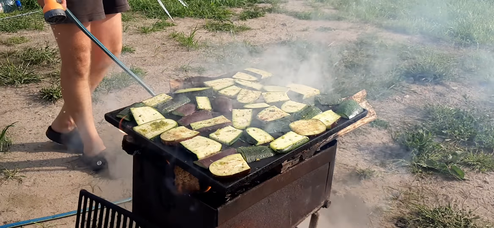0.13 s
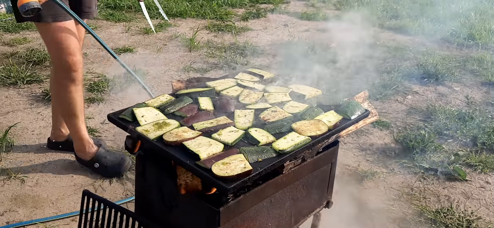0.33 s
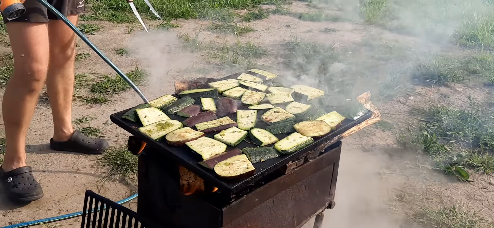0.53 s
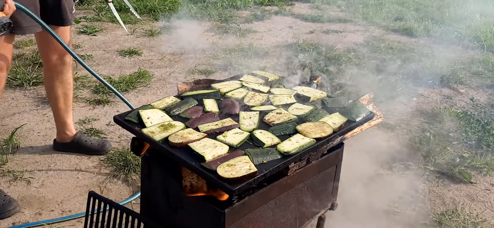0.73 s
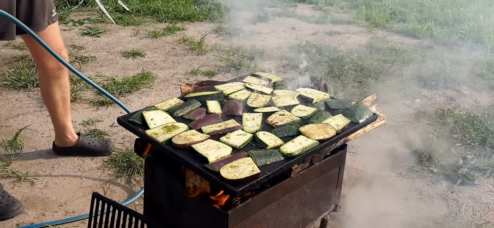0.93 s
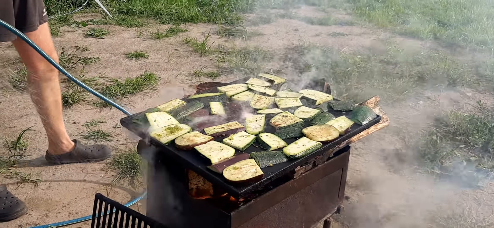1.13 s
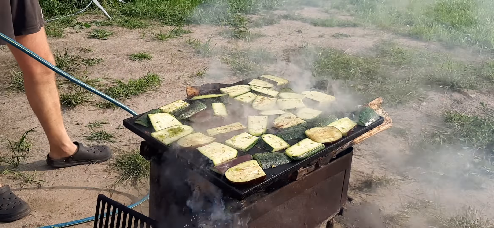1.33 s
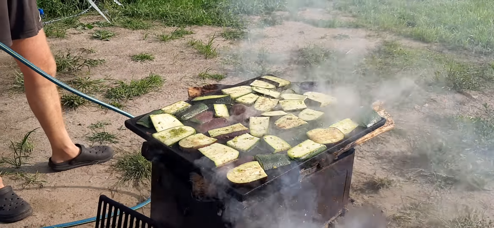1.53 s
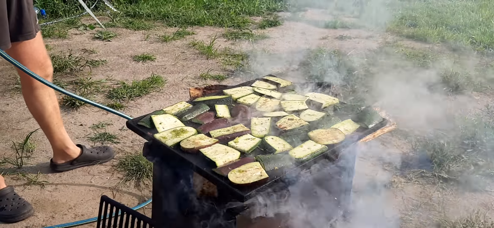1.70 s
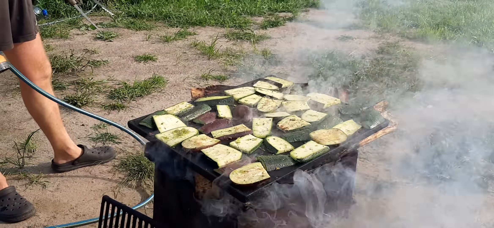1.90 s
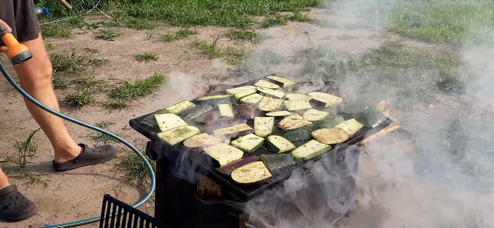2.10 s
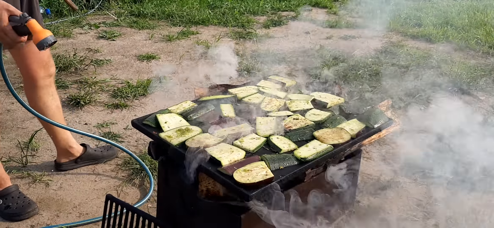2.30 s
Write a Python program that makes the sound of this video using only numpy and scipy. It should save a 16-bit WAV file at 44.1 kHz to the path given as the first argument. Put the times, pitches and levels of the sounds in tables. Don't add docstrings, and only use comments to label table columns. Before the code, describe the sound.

Vegetables sizzle steadily on a hot steel plate over a wood fire; a light water spray swells the fizz, then a jet hits the embers with a hollow roar and fading steam hiss, close stereo microphone outdoors.

```python
import sys
import numpy as np
from scipy import signal
from scipy.fft import rfft, irfft
from scipy.io import wavfile
from scipy.ndimage import uniform_filter1d

SR = 44100
rng = np.random.default_rng(int(sys.argv[2]) if len(sys.argv) > 2 else 0)


def generate_wav(signal):
    frames = np.transpose(np.atleast_2d(signal))
    scaled = np.clip(frames, -1, 1) * 32767
    pcm = np.round(scaled).astype(np.int16)
    wavfile.write(sys.argv[1], SR, pcm)


def gain_from_decibels(decibels):
    exponent = np.asarray(decibels, float) / 20
    return 10 ** exponent


N = 103635

# start_s, level_db
SIMMER_LEVEL = [
    (0, -39),
    (.1, -36.5),
    (.3, -37.5),
    (.42, -38),
    (.9, -35.5),
    (1.5, -34.5),
    (2.0, -42),
    (2.35, -42.5),
]
# start_s, level_db
SPRAY_LEVEL = [
    (.42, -44.5),
    (.52, -39),
    (.6, -34),
    (.68, -30.5),
    (.73, -32),
    (.82, -34),
    (.95, -35.5),
    (1.1, -37.5),
    (1.25, -70),
]
# start_s, level_db
SPURT_LEVEL = [
    (.64, -57),
    (.685, -39),
    (.72, -28),
    (.78, -36),
    (.84, -44),
    (.95, -70),
]
# start_s, level_db
STEAM_LEVEL = [
    (1.1, -59),
    (1.125, -29.5),
    (1.15, -23.5),
    (1.2, -24),
    (1.31, -27.5),
    (1.4, -29),
    (1.6, -33.5),
    (1.85, -37),
    (2.35, -40.5),
]
# start_s, level_db
JET_LEVEL = [
    (1.06, -72),
    (1.115, -60),
    (1.145, -31.5),
    (1.19, -30.5),
    (1.28, -35),
    (1.325, -42.5),
    (1.365, -52.5),
    (1.6, -60),
    (1.9, -81),
]
# start_s, level_db
FLAME_LEVEL = [(0, -55), (.1, -53), (.45, -52), (.52, -60), (.58, -50), (.9, -53), (1.0, -61), (1.1, -52),
               (1.35, -56), (1.58, -55), (1.63, -66), (1.85, -65), (1.95, -55), (2.1, -60), (2.35, -64)]
# start_s, peak_db
SPITS = [(.0552, -30), (.0946, -28), (.2148, -30), (.4089, -26), (.5454, -26), (.5685, -22), (.5829, -26),
         (.6882, -23), (1.0948, -27), (1.1292, -23), (1.1447, -19), (1.4974, -22), (1.679, -14.5),
         (1.911, -27), (1.9953, -21), (2.0701, -27), (2.0881, -28), (2.3245, -29)]
# start_s, peak_db
KNOCKS = [
    (.097, -55),
    (.142, -57),
    (.652, -51),
    (.987, -58),
    (1.499, -52),
    (1.989, -57),
    (2.079, -60),
]

# pitch_hz, level_db per Hz
SIMMER_TONE = [(100, -32), (520, -24.5), (1050, -12.5), (1500, -7), (3500, -6.5), (7000, -1), (11000, 2),
               (16000, 2)]
SPRAY_TONE = [(200, -19), (1000, -22.5), (2000, -16), (4300, -3.5), (6000, -6), (8500, -3.5), (11000, 3.5),
              (16000, -2)]
SPURT_TONE = [(3000, -35), (12500, -33), (14200, -2), (16000, -7)]
STEAM_TONE = [(200, -15), (900, -16), (1500, -7), (3800, -4.5), (6000, -4), (8000, -2.5), (12000, 1.5),
              (16000, -1)]
JET_TONE = [(40, -25), (110, 1), (220, -2), (520, 4), (1000, 3), (1250, -2), (2300, -3), (6000, -19)]
FLAME_TONE = [(20, -32), (40, -24.5), (60, 5), (80, 0), (110, -14), (150, -24), (300, -25.5), (900, -48)]

# pitch_hz, width_hz, level_db
BOX = [(120, 25, 3), (300, 40, 3), (405, 30, 3), (535, 40, 4), (860, 70, 3), (960, 40, 2), (1350, 60, 4),
       (1480, 60, 3)]
# pitch_hz, width_hz, left_db, right_db
HOUSING = [(1513, 160, 9, 9.5), (2053, 97, 6.5, 6.5), (2740, 900, 3, -1), (3520, 1220, 0.5, 4.5),
           (5300, 67, -19, -2.5), (6770, 960, -4.5, -4), (8170, 1220, 3.5, 2.5), (9820, 580, -0.5, -8),
           (12180, 1530, 4, 3.5), (12540, 650, -5, -7)]
# pitch_hz, width_hz, level_db
TOP_LIFT = (15400, 1000, 3.5)
NOTCH = (2960, 120, -10)
SPOT_OFFSETS = np.linspace(-1, 1, 5)


def evened(x):
    return x / np.sqrt(np.mean(x ** 2) + 1e-20)


def curve(points):
    return np.interp(np.arange(N) / SR, *np.transpose(points))


def tone(points, hz):
    f, db = np.transpose(points)
    return np.interp(np.log(hz + 1), np.log(f + 1), db)


def bumps(hz, f, width, db):
    return (db / (1 + ((hz[:, None] - f) / width) ** 2)).sum(1)


def colour(x, shape):
    size = 8192
    log_gain = np.log(gain_from_decibels(shape(abs(np.fft.fftfreq(size, 1 / SR)))))
    taps = np.fft.ifft(np.exp(np.conj(signal.hilbert(log_gain)))).real[:size // 2]
    taps = taps.reshape((1,) * (x.ndim - 1) + (-1,))
    return signal.fftconvolve(x, taps, axes=-1)[..., :N]


def wander(top_hz, count):
    hz = np.fft.rfftfreq(N, 1 / SR)
    spectrum = rfft(rng.standard_normal((count, N))) / (1 + (hz / top_hz) ** 2)
    return np.array([evened(v) for v in irfft(spectrum, N)])


def ports(spots, lag_us, spread_us):
    hz = np.fft.rfftfreq(N, 1 / SR)
    lag_s = (lag_us + spread_us * SPOT_OFFSETS)[:, None] * 1e-6
    left = irfft((rfft(spots) * np.exp(-2j * np.pi * hz * lag_s)).sum(0), N)
    return np.array([left, spots.sum(0)])


def patchy(x, patchy_db=1.1):
    z = signal.stft(x, nperseg=256)[2]
    patches = uniform_filter1d(rng.standard_normal(z.shape[1:]), size=6, axis=0)
    patches = evened(uniform_filter1d(patches, size=18, axis=1))
    return signal.istft(z * gain_from_decibels(patchy_db * patches), nperseg=256)[1][:, :N]


def fizz(level, shape, per_s, size_db, hiss, flicker_db, lag_us, spread_us, scatter):
    count = len(SPOT_OFFSETS) + 2
    pops = (rng.random((count, N)) < per_s / SR) * rng.choice([-1., 1.], (count, N))
    sizes = np.minimum(rng.exponential(1, (count, N)), 5)
    pops = evened(pops * gain_from_decibels(size_db * sizes))
    flicker = wander(9.2, count) + wander(150, count)
    spots = (pops + hiss * rng.standard_normal((count, N))) * gain_from_decibels(flicker_db * flicker)
    direct = evened(ports(spots[2:], lag_us, spread_us))
    scattered = evened(colour(spots[:2], lambda hz: tone([(700, -8.5), (4000, 10)], hz)))
    sound = colour(direct + scatter * scattered, shape)
    return gain_from_decibels(curve(level)) * evened(patchy(sound))


def simmer():
    return fizz(SIMMER_LEVEL, lambda hz: tone(SIMMER_TONE, hz), per_s=2500, size_db=4.0, hiss=0.67,
                flicker_db=1.4, lag_us=20, spread_us=61, scatter=1.0)


def spray():
    return fizz(SPRAY_LEVEL, lambda hz: tone(SPRAY_TONE, hz), per_s=2500, size_db=2.0, hiss=0.53,
                flicker_db=-0.2, lag_us=31, spread_us=7.8, scatter=1.0)


def spurt():
    return fizz(SPURT_LEVEL, lambda hz: tone(SPURT_TONE, hz), per_s=4000, size_db=2.5, hiss=1.5,
                flicker_db=.8, lag_us=38, spread_us=13, scatter=.9)


def steam():
    return fizz(STEAM_LEVEL, lambda hz: tone(STEAM_TONE, hz), per_s=2300, size_db=2.5, hiss=0.87,
                flicker_db=1.18, lag_us=-86, spread_us=23, scatter=1.63)


def jet():
    return fizz(JET_LEVEL, lambda hz: tone(JET_TONE, hz) + bumps(hz, *np.transpose(BOX)), per_s=710,
                size_db=2.5, hiss=0.88, flicker_db=1.1, lag_us=-90, spread_us=40, scatter=.45)


def spits():
    decay_ms, spray_share, lift_db = .6, .35, 4
    delay_s, bounce_s, bounce_db = .0018, .002, -5
    t = np.arange(600) / SR
    out = np.zeros((2, N + 2000))
    for start_s, peak_db in SPITS:
        noise = rng.standard_normal((2, len(t)))
        snap = spray_share * noise * np.exp(-t * 1000 / decay_ms) - (t == 0)
        for late_s, gain_db in ((delay_s, 0), (delay_s + bounce_s, bounce_db)):
            first = round((start_s + late_s) * SR)
            out[:, first:first + len(t)] += gain_from_decibels(peak_db + lift_db + gain_db) * snap
    return colour(out, lambda hz: tone([(500, -22), (2500, -5), (4000, 2), (16000, -3)], hz))


def flames():
    steadiness, side_db = .6, .6
    both, own = rng.standard_normal(N), rng.standard_normal((2, N))
    flutter = evened(colour(both + .17 * own, lambda hz: tone(FLAME_TONE, hz)))
    power = uniform_filter1d((flutter ** 2).mean(0), size=1500)
    swing = np.sqrt(uniform_filter1d(power, size=1500) + .05)
    steadied = evened(flutter / swing ** steadiness)
    return gain_from_decibels(curve(FLAME_LEVEL)) * steadied * gain_from_decibels([[side_db], [-side_db]])


def knocks():
    t60_s, lift_db = .1, -4
    t = np.arange(5000) / SR
    out = np.zeros(N + 5000)
    for start_s, peak_db in KNOCKS:
        first = round(start_s * SR)
        fade = gain_from_decibels(peak_db + lift_db - 60 * t / t60_s)
        out[first:first + len(t)] += fade * rng.standard_normal(len(t))
    return colour(out, lambda hz: tone([(100, -8), (250, 8), (1000, 8), (2000, -15)], hz))


def scene():
    plate = simmer() + spray() + spurt() + spits()
    fire_box = steam() + jet() + flames() + knocks()
    return plate + fire_box


def band_limit(x):
    return signal.sosfilt(signal.butter(12, 17100, fs=SR, output="sos"), x)


def record(dry):
    edge_hz, right_db = 15850, 4.5
    f, width, *sides = np.transpose(HOUSING)
    shared = np.transpose([TOP_LIFT, NOTCH])
    heard = np.array([colour(port, lambda hz: bumps(hz, f, width, side_db) + bumps(hz, *shared))
                      for port, side_db in zip(dry, sides)])
    edge = signal.firwin(601, edge_hz, window=("kaiser", 7), fs=SR)[None]
    mix = signal.oaconvolve(heard, edge, "same") * gain_from_decibels([[-right_db / 2], [right_db / 2]])
    return band_limit(mix)


dry = scene()
out = record(dry)
generate_wav(out)
```